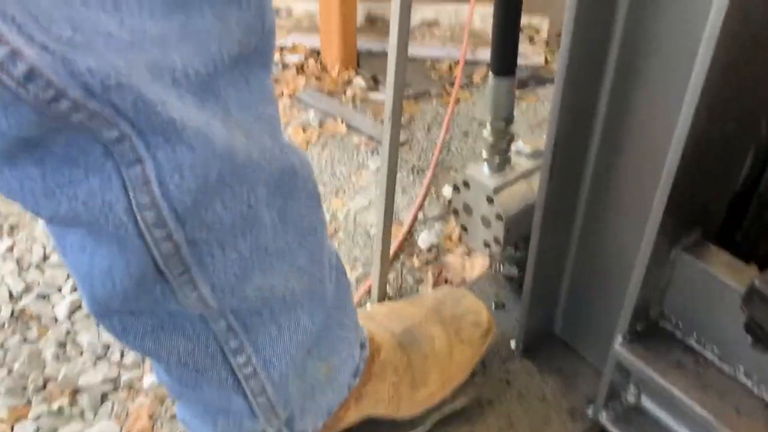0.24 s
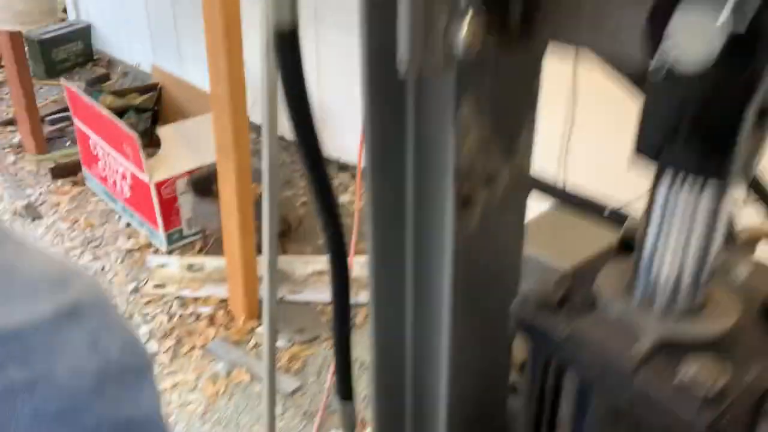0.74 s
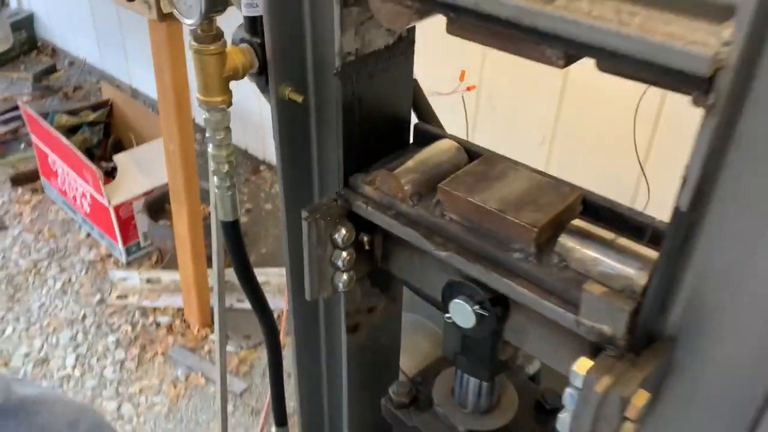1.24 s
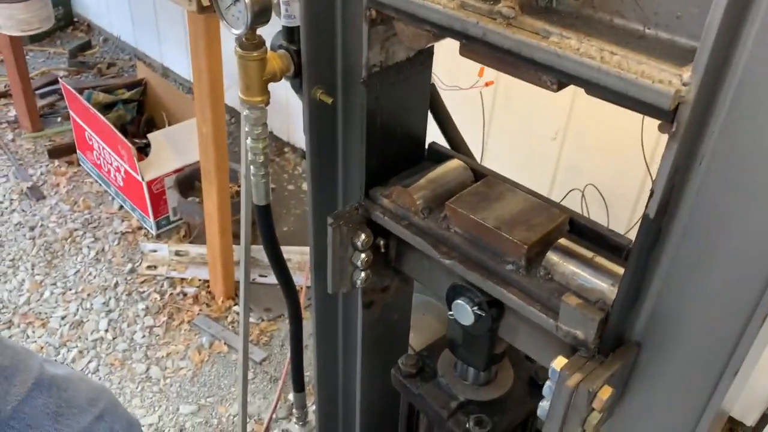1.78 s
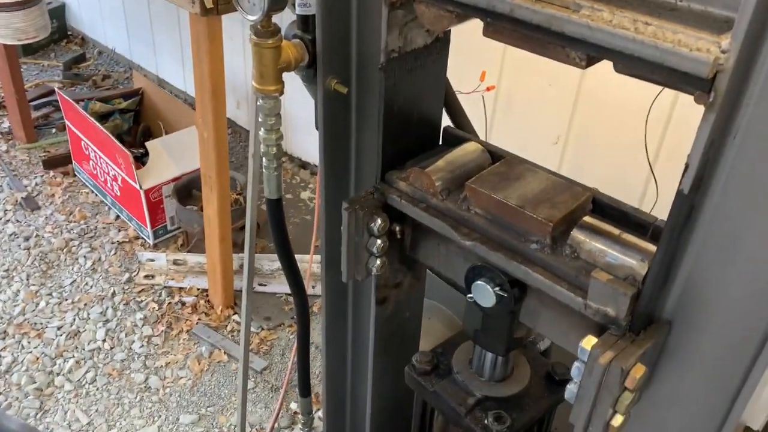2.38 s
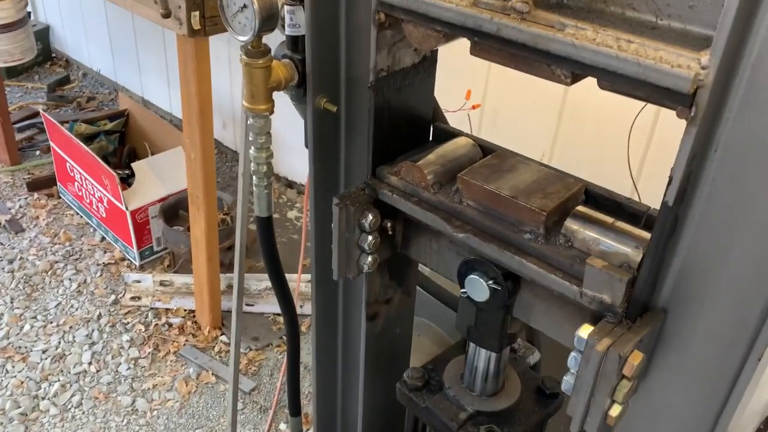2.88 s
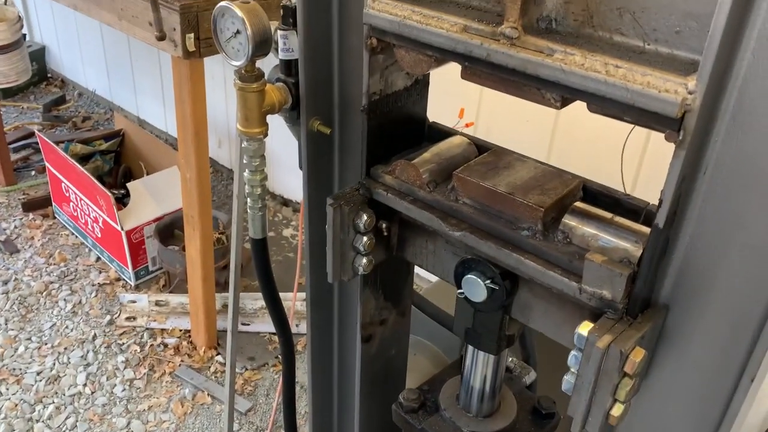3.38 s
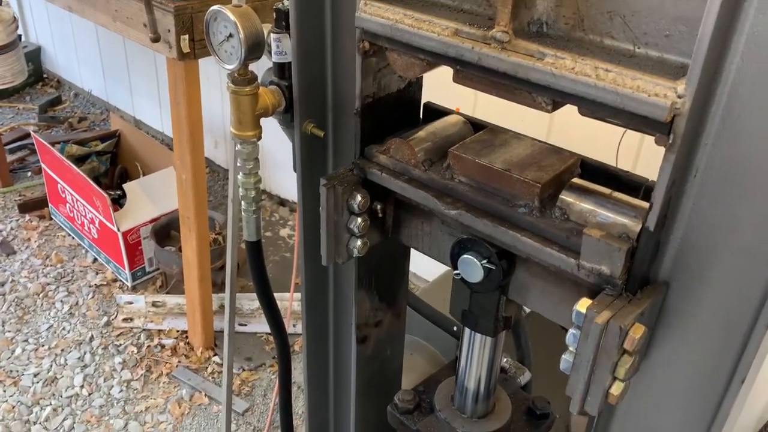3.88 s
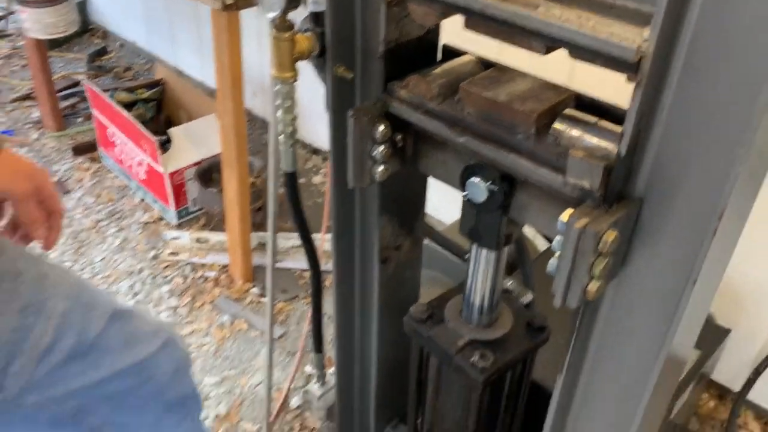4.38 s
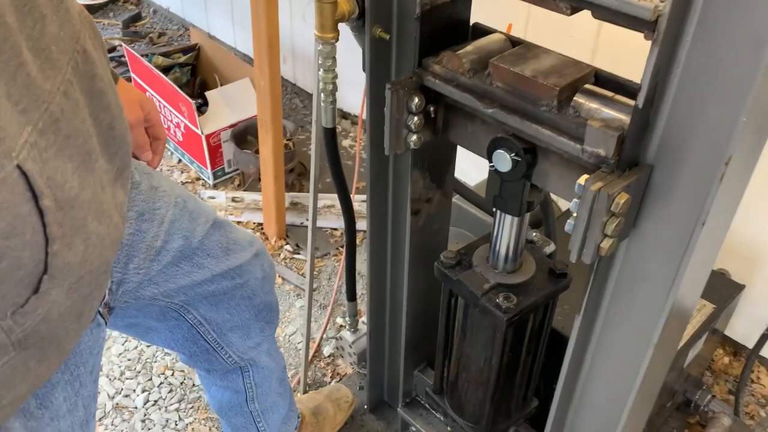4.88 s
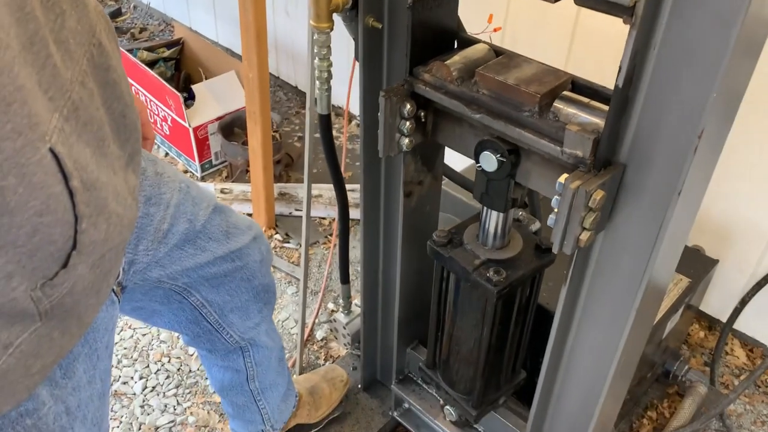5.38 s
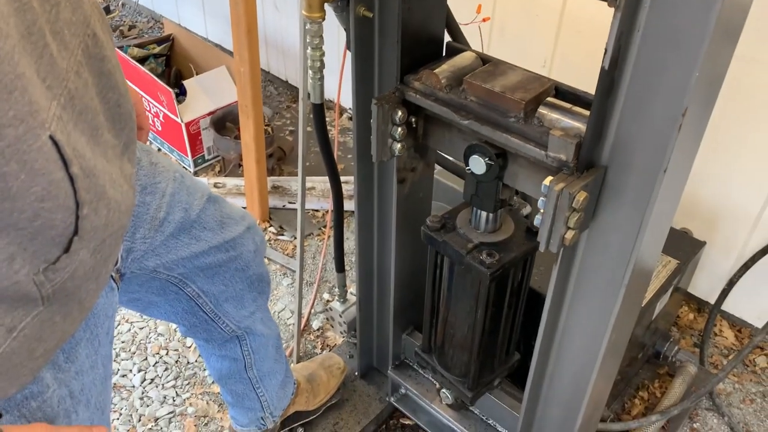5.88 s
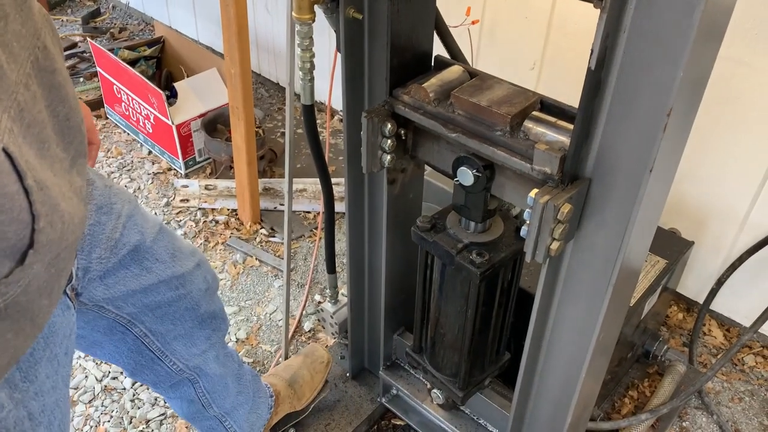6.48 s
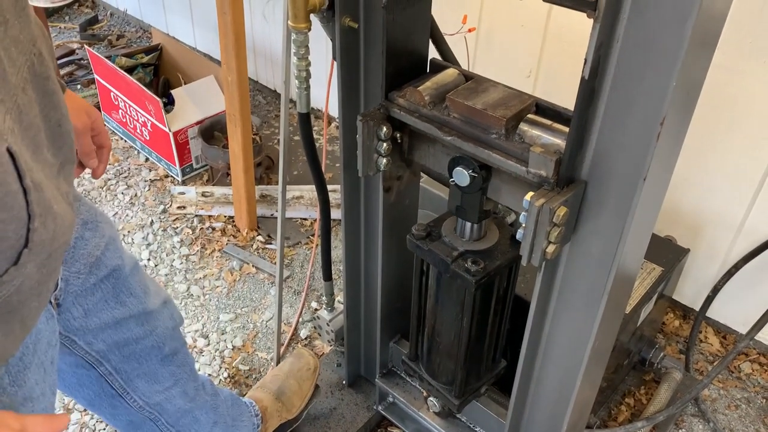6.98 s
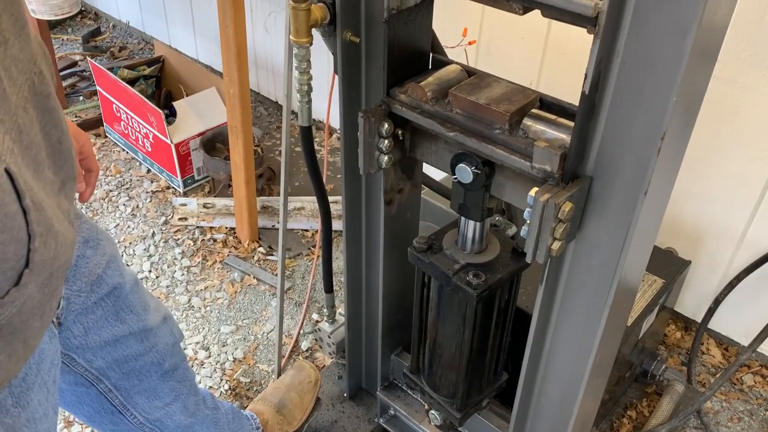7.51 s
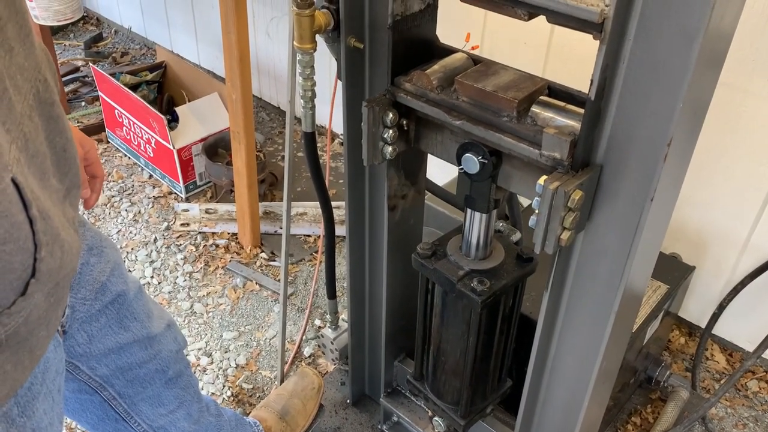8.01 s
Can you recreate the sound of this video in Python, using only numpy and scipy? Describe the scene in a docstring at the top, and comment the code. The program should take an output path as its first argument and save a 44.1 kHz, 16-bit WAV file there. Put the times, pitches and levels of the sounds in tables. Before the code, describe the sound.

Close, hand-held stereo sound of a hydraulic power unit by a workshop wall: steady mid-pitched gear whine with buzzing high overtones, a low hum, casing noise, fan rumble and airy hiss. The whine is weak, surges, stays strong, fades in the middle and comes back abruptly. A small click marks the fade; a firmer clunk comes after the return, then a faint tick near the end.

```python
"""An electric motor turns a two-stage gear pump beside a forging press, half outdoors.
First the ram is drawn down: the twelve-tooth whine starts faint and swells briefly near 0.9 s. It is loud
at rest from 1.6 s and while the ram rises from 2.1 s, then soft as the ram is drawn down from 4.4 s.
The pedal valve knocks at 4.6 s and again near 6.7 s; the whine is loud again from 6.2 s, with a faint tick at 7.9 s.
An eleven-tooth stage hums and fan, casing and oil make noise throughout, as a hand-held pair of microphones moves."""
import sys
import numpy as np
from scipy import signal
from scipy.fft import rfft, irfft
from scipy.io import wavfile
from scipy.ndimage import uniform_filter1d

SR = 44100
rng = np.random.default_rng(int(sys.argv[2]) if len(sys.argv) > 2 else 0)


def invert_db(x):
    """Field ratio 10**(x/20) for x, a level in decibels (scalar or array-like)."""
    u = np.asarray(x, float) / 20
    return 10 ** u


def store_wav(level_fs):
    """Save 16-bit WAV to argv[1]."""
    pcm = np.round(np.clip(np.atleast_2d(level_fs), -1, 1) * 32767)
    wavfile.write(sys.argv[1], SR, pcm.T.astype(np.int16))


N = 363825


def rms_one(x):
    """Scale to rms 1."""
    return x / np.sqrt(np.mean(x ** 2) + 1e-20)


def in_time(rows):
    """Turn rows that start with a time in seconds into one smooth-running curve per column."""
    s, *columns = np.transpose(rows)
    return [np.interp(np.arange(N) / SR, s, column) for column in columns]


def at_hz(points, hz):
    """Read a table of (Hz, value) on a log-frequency axis."""
    table_hz, values = np.array(points).T
    return np.interp(np.log(hz + 1), np.log(table_hz), values)


def drift(rate_hz):
    """Random wandering of rms 1, slower than about rate_hz, drawn every 100 samples."""
    r = np.exp(-200 * np.pi * rate_hz / SR)
    white = rng.standard_normal(N // 100 + 2002)
    slow = signal.lfilter([1], [1, -2 * r, r * r], white)[2000:]  # drop the filter's start-up
    return np.interp(np.arange(N) / 100, np.arange(len(slow)), rms_one(slow - slow.mean()))


# How alike the two microphones hear a sound. Each row: Hz, share of power common to both.
LIKENESS = [(60, 0.89), (300, 0.97), (640, 0.67), (1030, 0.38), (2300, 0.24), (3000, 0.041), (6200, 0.022),
            (7100, 0.47), (8000, 0.91), (16000, 0.98)]
# Which side is stronger. Each row: Hz, left minus right in dB.
LEFT_RIGHT = [(60, 1.5), (110, 2.5), (200, -0.5), (380, 1), (700, -3.5), (1290, 3), (2380, 1.5),
              (4400, -2.5), (8120, -1), (15000, 1)]


def two_ports(direct, stray):
    """Both microphones share the direct sound, its treble bent in time between them; the rest is unrelated."""
    in_step_hz, lag_ms, direct_from_hz = 10960, 0.22, 6200  # the treble reaches the left later
    hz = np.arange(N // 2 + 1) * SR / N
    alike = np.clip(at_hz(LIKENESS, hz), 0, 1)
    lead = -np.pi * (hz - in_step_hz) * lag_ms / 1000 * (hz > direct_from_hz)  # half each way
    turn = np.exp(1j * lead * np.array([[1], [-1]]))
    lean = invert_db(at_hz(LEFT_RIGHT, hz) * np.array([[.5], [-.5]]))
    shared = np.sqrt(alike) * rfft(direct) * turn
    separate = np.sqrt(1 - alike) * rfft(stray)
    return irfft(lean * (shared + separate), N)


def line(turns, level_db, apart=.6, pan_db=0, lead=0):
    """A sine of given rms; its phase gap in radians, left ahead by lead, wanders by apart."""
    halves = np.array([[.5], [-.5]])
    gap = (lead + apart * drift(0.61)) * halves
    return np.sqrt(2) * invert_db(level_db + pan_db * halves) * np.sin(2 * np.pi * turns + gap)


# Single lines stand out or fade for a while.
# Each row: middle in seconds, half length in seconds, multiple of the shaft rate, gain in dB.
SWELLS = [(0.14, 0.41, 13, 24), (0.9, 0.86, 108, 7), (0.34, .2, 108, 8), (1.45, .3, 108, 3),
          (2.38, 0.36, 72, 10), (2.46, 0.39, 84, 6), (3.26, 0.58, 96, 9), (3.75, .45, 96, 8),
          (3.8, 0.65, 168, 10), (4.8, 0.82, 36, 13.5), (4.95, 0.43, 204, 6.5), (7.5, 0.6, 48, 3),
          (7.04, 0.58, 156, 10.5), (0.54, 0.25, 36, 6.5), (1.9, 0.64, 36, 9.5), (7.7, .4, 36, 6),
          (3.8, 0.44, 60, 3), (5, 0.31, 60, 10), (0.55, 0.25, 72, 1), (0.98, 0.11, 72, 3),
          (1.72, 0.16, 72, 7), (1.3, .2, 72, -2), (3.34, .3, 72, -7), (3.85, .25, 72, 7),
          (7.4, 1.7, 72, -2), (3.6, 0.16, 72, -6), (5.6, 0.52, 84, -9), (7.3, 0.9, 84, 6),
          (5.6, .4, 96, -6), (7.15, 0.34, 96, 7.5), (4.03, 0.39, 108, 10), (5.9, .9, 108, 0),
          (1.54, 0.24, 120, 5), (5.6, 0.69, 120, 5), (7.8, 0.65, 120, 2), (6.57, 0.62, 120, 8),
          (1.85, .3, 132, -11), (2.44, 0.54, 132, 8), (6.1, 0.55, 156, 3.5), (7.1, 0.66, 168, 5.5),
          (1.2, 0.59, 180, 8.5), (7.8, 0.8, 180, 6), (7.5, .6, 192, 7), (1.55, 0.18, 204, 9),
          (4.438, .03, 168, 12), (4.436, .025, 180, 9), (4.445, .045, 204, 10), (4.53, .06, 120, 13),
          (7.1, 1.1, 25, 26), (0.73, 0.84, 23, 24), (.1, 0.74, 9, 17), (0.42, .15, 13, 13.5),
          (5.93, 0.64, 4, 11.5), (7.1, 1.6, 2, 8)]


def swell_db(order):
    """Gain of one multiple of the shaft rate: the sum of its swells, each a smooth bump."""
    t = np.arange(0, N + 200, 200) / SR
    gain_db = np.zeros(len(t))
    for middle, half, multiple, db in SWELLS:
        if multiple == order:
            gain_db += db * np.cos(np.clip((t - middle) / half, -1, 1) * np.pi / 2) ** 2
    return np.interp(np.arange(N) / SR, t, gain_db)


# The pedal shifts the valve.
# Each row: time in seconds, new state (0 ram drawn down, 1 at rest, 2 ram rising).
PEDAL = [(0, 0), (1.645, 1), (2.1, 2), (4.06, 1), (4.42, 0), (6.205, 1), (6.69, 2)]
# The load slows the motor: teeth per second in Hz for states 0, 1 and 2, before the pitch shift below.
TOOTH_HZ = [713.1, 715.5, 714.5]
# The pitch sags while the microphones swing up. Each row: time in seconds, shift of the tooth rate in Hz.
SWING = [(0, .7), (.55, -1.4), (.95, -1.4), (1.5, 0)]


def tooth_rate():
    """The tooth rate glides to that of each new valve state as the motor settles under the load."""
    settle_s = .07
    s, state = np.transpose(PEDAL)
    latest = np.searchsorted(s, np.arange(N) / SR, "right") - 1
    held = np.array(TOOTH_HZ)[state.astype(int)][latest]
    return uniform_filter1d(held, size=round(settle_s * SR), mode="nearest") + in_time(SWING)[0]


# The tone at the tooth rate. Each row: time in seconds, level in dB, left minus right in dB.
WHINE = [(0.0, -70, 1), (0.4, -53, 12), (0.69, -41, 10), (0.89, -36, -0.5), (1.17, -44, 3),
         (1.35, -42.5, 6), (1.58, -40.5, 2), (1.7, -35, -3.5), (2.02, -35.5, -2), (2.1, -37, 3),
         (2.34, -34.5, 2), (3.86, -34, 0), (4.2, -31, -1.5), (4.37, -33, -1.5), (4.46, -39.5, -1),
         (4.75, -44, 6.5), (5.25, -48, 15), (5.61, -48.5, -12), (6.13, -51, -15), (6.23, -34.5, 2.5),
         (6.66, -32.5, 2), (6.71, -38.5, 5.5), (7.25, -35, 4), (8.25, -34.5, 2.5)]


def whine(shaft):
    """Twelve teeth meet per turn and sound one sine at the tooth rate, with a slight fast flicker."""
    level_db, pan_db = in_time(WHINE)
    return line(12 * shaft, level_db + .4 * drift(25), .4, pan_db)


# Overtones of the whine, before swells and wavering. Each row: multiple of the tooth rate,
# level in dB while the whine is soft, level in dB while it is loud, change in dB over a full step aside.
OVERTONES = [(3, -64, -67.5, 3), (4, -65, -61, 7), (5, -67.5, -65.5, 0), (6, -64.5, -62, 2.5),
             (7, -61.5, -62.5, 6.5), (8, -61.5, -63.5, 9.5), (9, -57, -60.5, 7), (10, -56.5, -57.5, 2),
             (11, -54.5, -56.5, 10.5), (12, -54.5, -55.5, -0.5), (13, -56, -59, 1.5), (14, -60, -63, 4.5),
             (15, -61, -63.5, -0.5), (16, -65, -66, 4), (17, -58, -63, -1), (18, -63, -70, 6),
             (19, -61, -58, 5), (21, -52, -51.5, 0)]
# The twelve teeth differ. Each row: relative strength in dB, timing error in thousandths of a turn.
TEETH = [(2.5, 0.5), (-0.5, -0.18), (5, 0.27), (2, -0.16), (3.5, 0.21), (-7, -0.43), (-4, -0.071),
         (-12, 0.084), (-5, -0.19), (4, -0.3), (-2.5, -0.17), (5, -0.14)]
# Phase of the direct path and the two stray paths, in cycles; the strays lie a quarter cycle apart.
PATH_CYCLES = [0, .125, -.125]
# The microphones step aside. Each row: time in seconds, share of the way to the later standpoint.
STEP_ASIDE = [(4.3, 0), (5.4, 0.63)]


def overtones(shaft, loud, broad_db, spread=4.5):
    """Uneven teeth give each overtone side lines one shaft multiple apart."""
    wobble_turns = 0.00064       # the shaft runs out of true once a turn
    path_wander_cycles = .06     # the hand moves, so each path changes length
    waver_db, waver_hz, flutter_db, flutter_hz = .6, 1.44, 1.8, 6.3
    size = 32768                 # steps in one stored turn
    order = np.arange(size // 2 + 1)
    strength_db, late = np.transpose(TEETH)
    place = np.arange(12) / 12
    place = place + late / 1000 + wobble_turns * np.sin(2 * np.pi * place)
    pulses = np.exp(-2j * np.pi * np.outer(order, place)) @ invert_db(strength_db)
    at = shaft % 1 * size
    moved = in_time(STEP_ASIDE)[0] - .5
    out = np.zeros((3, N))
    for k, soft_db, loud_db, moved_db in OVERTONES:
        centre = 12 * k
        off = order - centre
        near = (off > -6.5) & (off < 5.5)
        one_turn = rms_one(irfft(pulses * near * np.exp(-(off / spread) ** 2)))
        state_db = soft_db + (loud_db - soft_db) * loud
        level = invert_db(state_db + moved_db * moved + broad_db + swell_db(centre))
        # one direct path, one stray path to each microphone, each starting at a random tooth
        for path, cycles in zip(out, PATH_CYCLES):
            offset = rng.integers(12) / 12 + (cycles + path_wander_cycles * drift(.6)) / centre
            wavering = invert_db(waver_db * drift(waver_hz) + flutter_db * drift(flutter_hz))
            path += level * wavering * one_turn[(at + size * offset).astype(int) % size]
    return two_ports(out[0], out[1:])


# Octave of the whine, before flutter. Each row: time in seconds, level in dB.
OCTAVE = [(0, -59), (.45, -52), (.85, -47.5), (1.1, -54), (1.4, -71), (1.72, -47.5), (2.15, -57),
          (2.6, -68), (3.0, -54), (3.5, -51), (4.0, -51.5), (4.2, -47), (4.6, -62), (5.6, -54), (6.0, -58),
          (6.68, -54), (6.76, -45), (7.6, -43), (8.25, -44.5)]
# Eleven-tooth stage, before flutter.
# Each row: time in seconds, tooth tone in dB, twice its rate in dB, three times its rate in dB.
SMALL_STAGE = [(0, -62, -55, -60), (.4, -55, -52, -54.5), (1.0, -52, -50, -69), (1.35, -55, -49, -57),
               (1.75, -56, -79, -56.5), (2.2, -54.5, -53, -60), (2.9, -54.5, -57, -60),
               (3.6, -54, -62, -60), (3.95, -52.5, -64, -61.5), (4.17, -65, -49, -46.5),
               (4.45, -56.5, -52.5, -55), (5.5, -54, -55, -60), (6.3, -54, -50, -58),
               (6.8, -53, -55, -53.5), (8.25, -51.5, -57, -53.5)]
# Four values each, for the octave and the three small-stage tones:
# phase of left ahead of right in radians, slow flutter in dB, fast grain in dB.
STAGE_LEAD_RAD = [1.15, 0.093, 1.8, 1.17]
STAGE_FLUTTER_DB = [.9, .8, 1.2, 1.5]
STAGE_GRAIN_DB = [1.5, .3, 2.5, 1.5]


def octave_and_small_stage(shaft):
    """The whine's octave and three tones of the eleven-tooth stage, sines locked to the shaft."""
    flutter_hz, grain_hz = 7.2, 30
    levels = in_time(OCTAVE) + in_time(SMALL_STAGE)
    out = 0
    for k, lead, level_db, flutter_db, grain_db in zip(
            (24, 11, 22, 33), STAGE_LEAD_RAD, levels, STAGE_FLUTTER_DB, STAGE_GRAIN_DB):
        unsteady_db = flutter_db * drift(flutter_hz) + grain_db * drift(grain_hz)
        out = out + line(k * shaft, level_db + unsteady_db, apart=0.34, lead=lead)
    return out


# Weak tones of the turning shaft, before swells and flutter. Each row: multiple of the shaft rate, level in dB.
SHAFT_LINES = [(1, -70), (2, -67.5), (4, -64), (5, -62.5), (6, -64), (9, -71.5), (10, -65.5), (16, -62),
               (17, -63), (13, -73), (23, -80), (25, -85)]


def shaft_lines(shaft):
    """Sines at whole multiples of the shaft rate, each fluttering by itself."""
    out = 0
    for k, level_db in SHAFT_LINES:
        out = out + line(k * shaft, level_db + swell_db(k) + 3.6 * drift(5.2), apart=0.42)
    return out


# Broad noise as the microphones move, before flicker.
# Each row: time in seconds, then fan rumble, casing, oil hiss and top hiss, all in dB.
BROAD = [(0.0, -46.5, -47, -50, -48.5), (0.6, -46, -45, -49.5, -49.5), (1.15, -48.5, -45, -52.5, -52.5),
         (2.7, -47.5, -45.5, -53, -54.5), (4.35, -47, -46, -52.5, -54), (4.6, -46.5, -45, -51.5, -57),
         (5.5, -45.5, -45, -51, -54), (6.1, -44, -42, -49, -51.5), (7.0, -43.5, -42, -48.5, -51.5),
         (8.25, -44, -42, -49.5, -51)]


def pump():
    """Whine, overtones, small stage and shaft lines are all locked to one shaft."""
    soft_db, loud_db = -44, -43.5  # whine levels that mark the soft and loud states
    shaft = np.cumsum(tooth_rate()) / 12 / SR  # turns so far
    loud = np.clip((in_time(WHINE)[0] - soft_db) / (loud_db - soft_db), 0, 1)
    top_db = in_time(BROAD)[3]
    follow_db = 0.62 * (top_db - top_db.mean())  # overtones partly follow the top hiss
    tones = whine(shaft) + octave_and_small_stage(shaft) + shaft_lines(shaft)
    return tones + overtones(shaft, loud, follow_db), shaft


# Pedal valve. Each row: start in seconds, strength in dB, lowest Hz, highest Hz,
# seconds in which the loudness falls by 60 dB.
KNOCKS = [(4.611, -38, 1800, 6800, 0.035), (6.661, -30.5, 200, 1500, 0.013), (6.8, -31, 70, 450, 0.08),
          (6.823, -33, 80, 500, .07), (6.799, -37, 1500, 6000, .14), (7.9, -50, 900, 6000, 0.08)]


def valve():
    """Each knock is a push followed by a short burst of noise that dies fast."""
    out, t = np.zeros(N), np.arange(SR // 8) / SR
    for s, strength_db, low_hz, top_hz, t60 in KNOCKS:
        burst = rng.standard_normal(len(t))
        burst[0] -= 4 * np.sqrt(SR / 2 / (top_hz - low_hz))  # the push
        band = signal.butter(2, [low_hz, top_hz], "band", fs=SR, output="sos")
        burst = rms_one(signal.sosfilt(band, burst))
        out[round(s * SR):][:len(t)] += invert_db(strength_db - 6 - 60 * t / t60) * burst
    return out


# Edges in Hz of the four noise bands: fan rumble, casing, oil hiss, top hiss.
BAND_EDGES_HZ = [20, 750, 2500, 7700, 16000]
# Basic colour of the noise; each band is levelled afterwards. Each row: Hz, relative dB per Hz.
NOISE = [(30, -94), (50, -79), (100, -80), (150, -77), (240, -73), (350, -77), (500, -76), (600, -77),
         (800, -72), (950, -73.5), (1120, -80.5), (1400, -74.5), (1600, -77.5), (2000, -78.5), (2600, -83),
         (3600, -84.5), (5300, -90), (6500, -88.5), (8000, -93), (9500, -92.5), (11000, -95.5),
         (13000, -99), (15000, -99.7)]
# Colour near the ground and from the later standpoint. Each row: Hz, gain in dB before levelling.
NEAR_GROUND = [(60, -3), (100, 6), (160, -0.5), (235, -7), (350, -2), (520, 8), (600, -4), (780, 4.5),
               (900, -1), (1020, 6), (1400, 0)]
LATER = [(60, 0), (100, 1), (160, -6.5), (235, 0.5), (350, 8), (520, 1.5), (600, -11), (800, -2.5),
         (950, 4), (1400, 0.5)]
# The microphones are lifted. Each row: time in seconds, share of the colour near the ground.
LIFT = [(.35, 0.81), (.7, 0.0076)]


def fan_casing_and_oil(shaft, throb=0.058, flicker_db=.6):
    """Noise coloured by the standpoint and levelled band by band; above the rumble it throbs once a turn."""
    white = rng.standard_normal((3, N))
    hz = np.arange(N // 2 + 1) * SR / N
    basic = rfft(two_ports(white[0], white[1:])) * invert_db(at_hz(NOISE, hz))
    low_down, aside = in_time(LIFT)[0], in_time(STEP_ASIDE)[0]
    plain = irfft(basic, N)
    ground = irfft(basic * invert_db(at_hz(NEAR_GROUND, hz)), N)
    later = irfft(basic * invert_db(at_hz(LATER, hz)), N)
    noise = rfft((1 - low_down - aside) * plain + low_down * ground + aside * later)
    out = 0
    for low, high, level_db in zip(BAND_EDGES_HZ, BAND_EDGES_HZ[1:], in_time(BROAD)):
        band = rms_one(irfft(noise * ((hz >= low) & (hz < high)), N))
        beat = 1 + throb * (low > 100) * np.sin(2 * np.pi * shaft)
        out = out + band * beat * invert_db(level_db + flicker_db * drift(8.6))
    return out


def scene():
    """Pump tones, valve knocks and noise together."""
    tones, shaft = pump()
    return tones + valve() + fan_casing_and_oil(shaft)


def band_limit(x):
    """A steep low-pass at the top of the band."""
    return signal.sosfilt(signal.butter(12, 16600, fs=SR, output="sos"), x)


def record(dry):
    """The lowest bass and the top treble are cut."""
    bass_cut = signal.butter(2, 45, "high", fs=SR, output="sos")
    top_cut = signal.cheby2(12, 60, 15700, fs=SR, output="sos")  # 60 dB down from 15700 Hz
    mix = signal.sosfilt(top_cut, signal.sosfilt(bass_cut, dry))
    return band_limit(mix)


dry = scene()
out = record(dry)
store_wav(out)
```